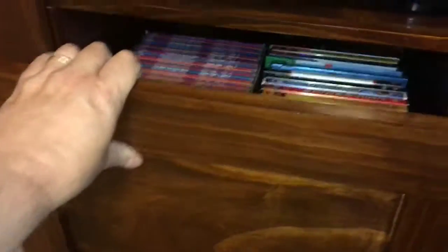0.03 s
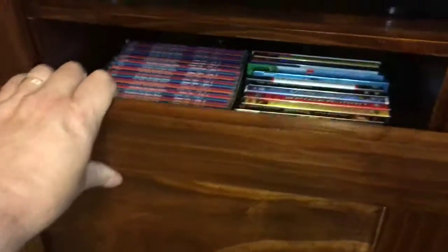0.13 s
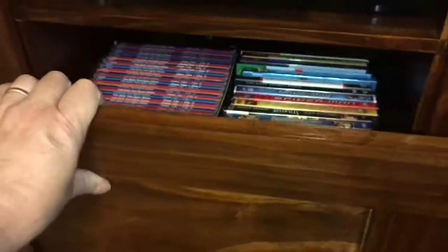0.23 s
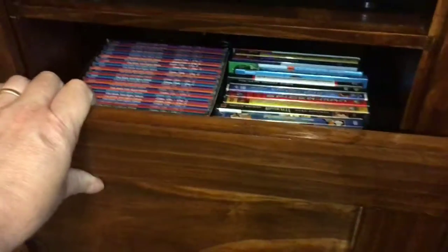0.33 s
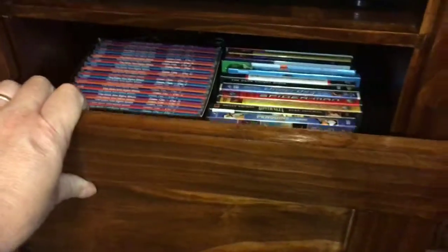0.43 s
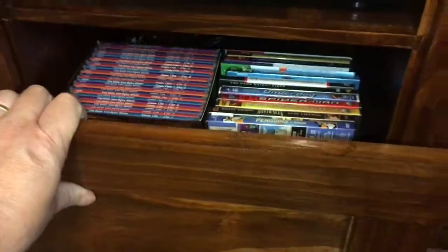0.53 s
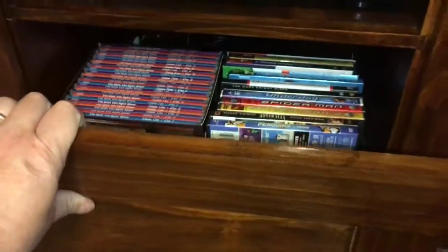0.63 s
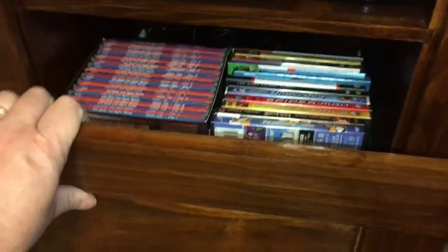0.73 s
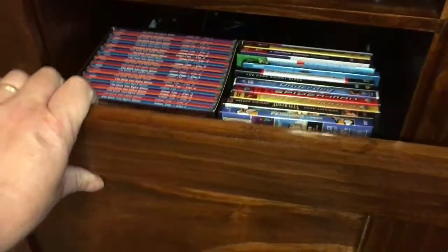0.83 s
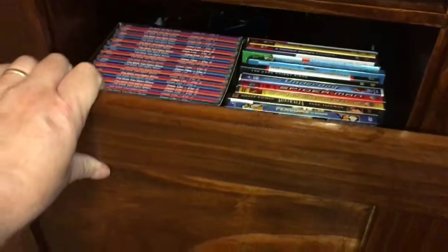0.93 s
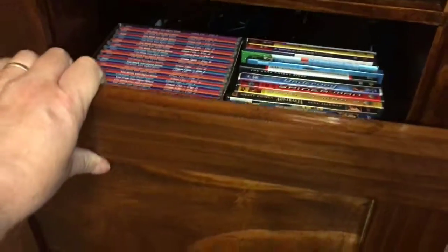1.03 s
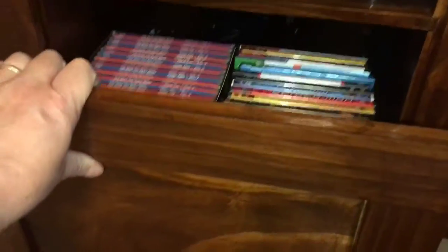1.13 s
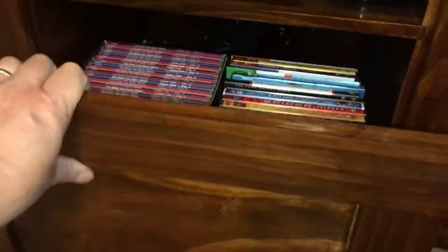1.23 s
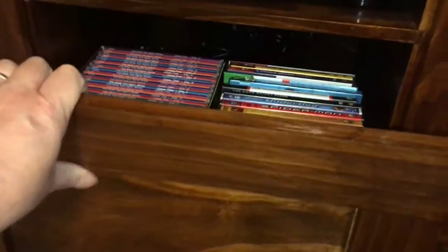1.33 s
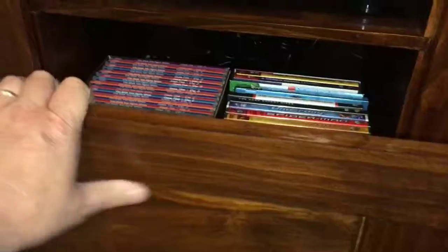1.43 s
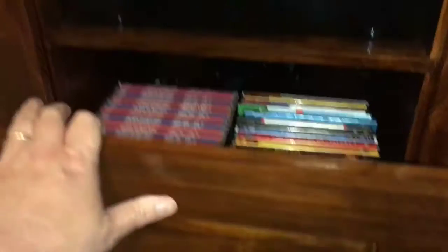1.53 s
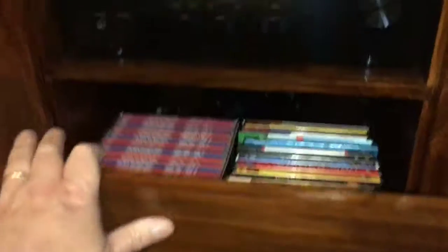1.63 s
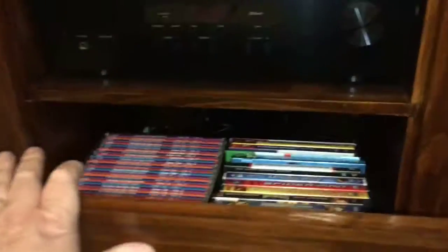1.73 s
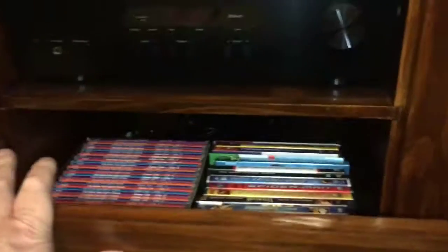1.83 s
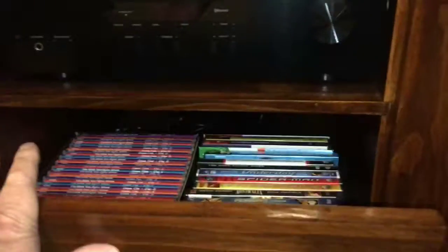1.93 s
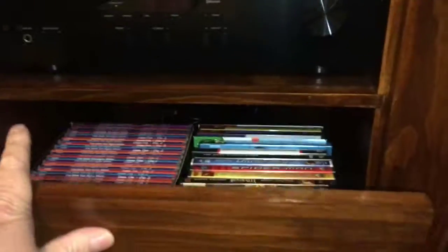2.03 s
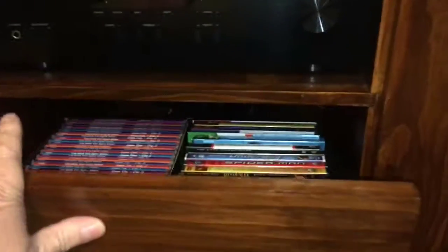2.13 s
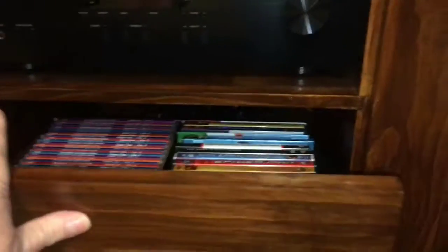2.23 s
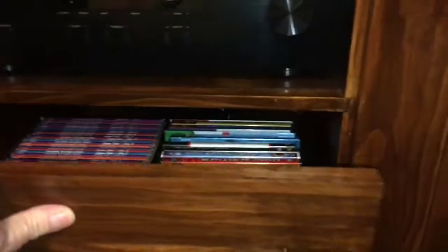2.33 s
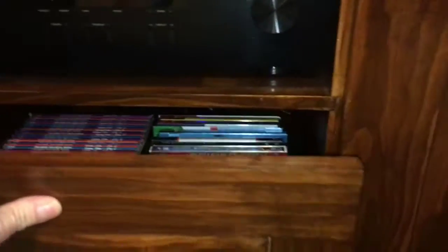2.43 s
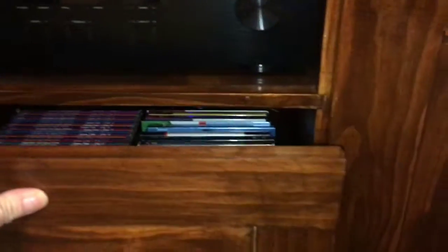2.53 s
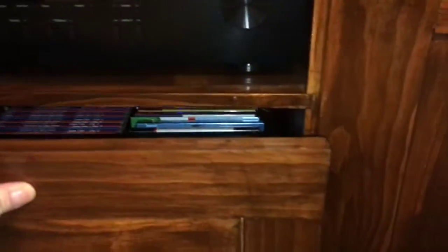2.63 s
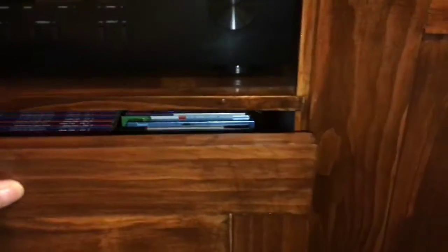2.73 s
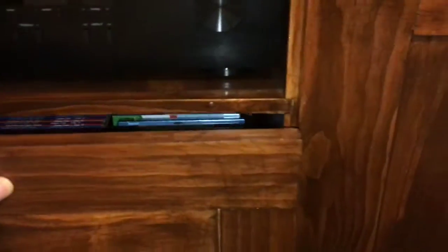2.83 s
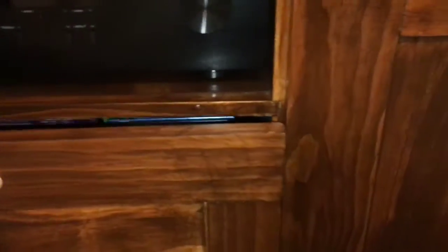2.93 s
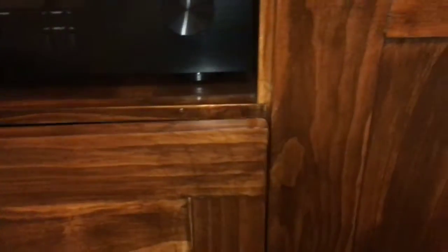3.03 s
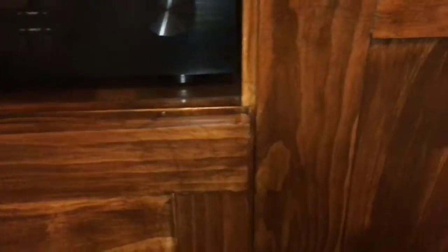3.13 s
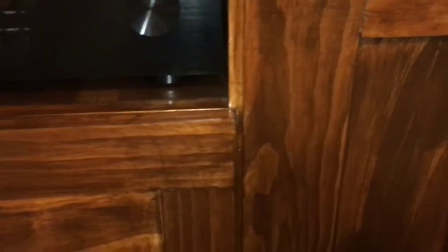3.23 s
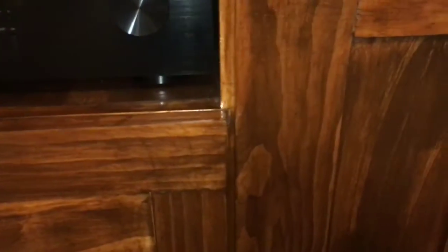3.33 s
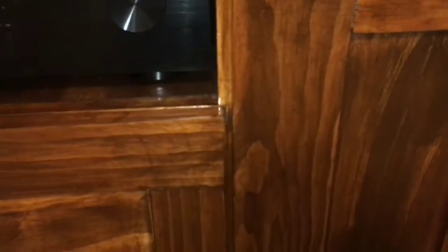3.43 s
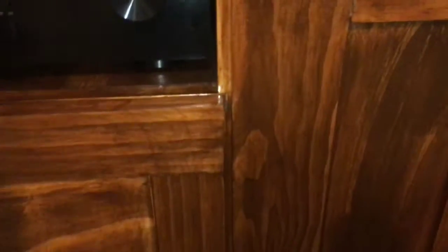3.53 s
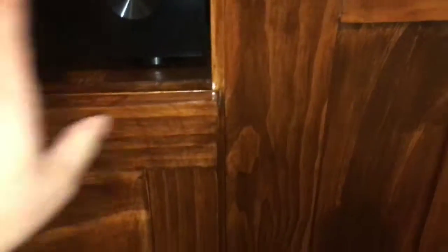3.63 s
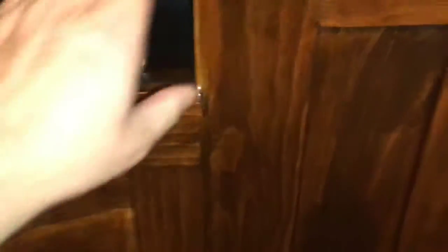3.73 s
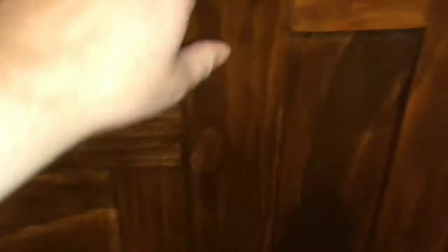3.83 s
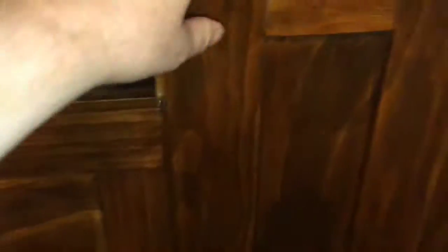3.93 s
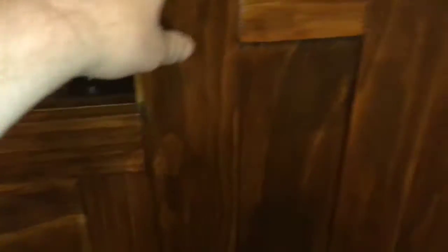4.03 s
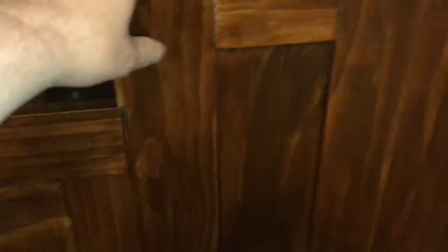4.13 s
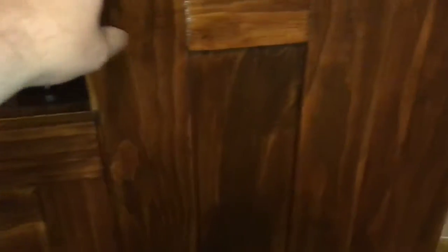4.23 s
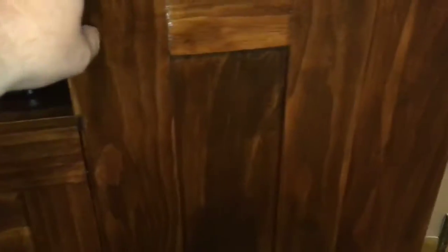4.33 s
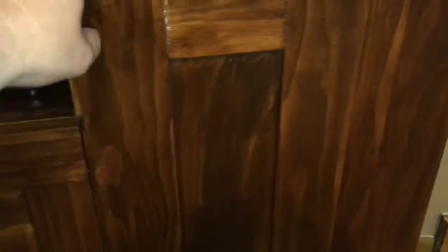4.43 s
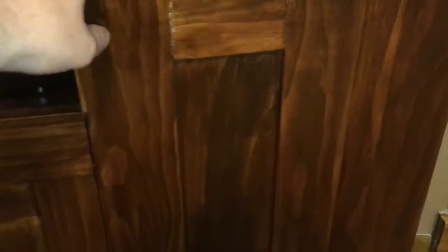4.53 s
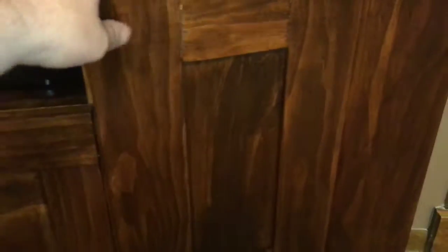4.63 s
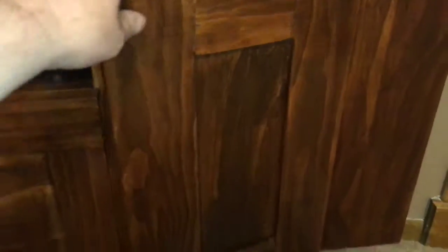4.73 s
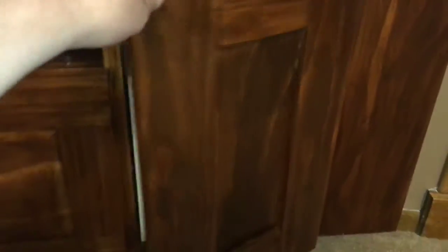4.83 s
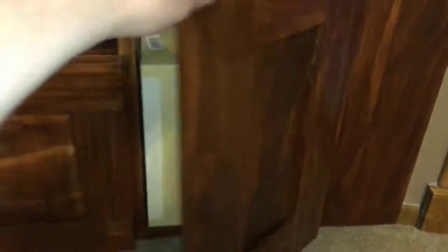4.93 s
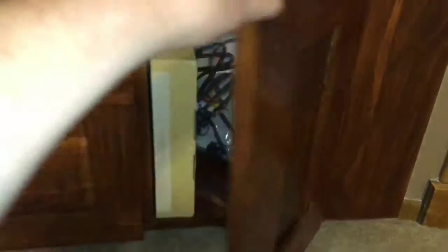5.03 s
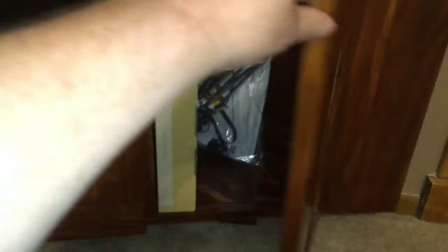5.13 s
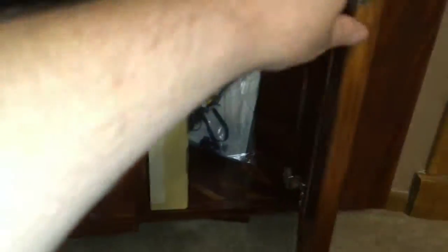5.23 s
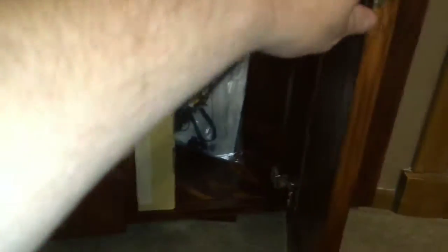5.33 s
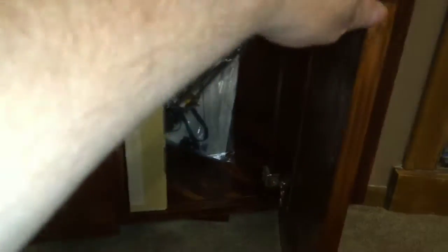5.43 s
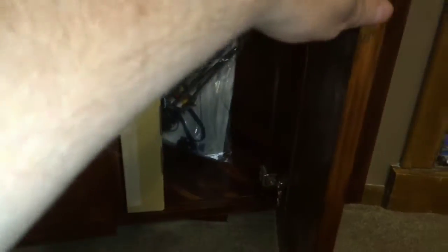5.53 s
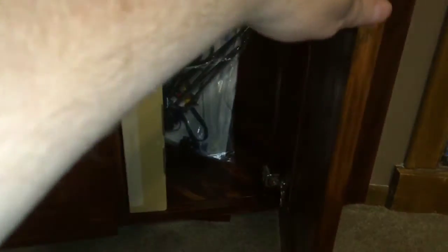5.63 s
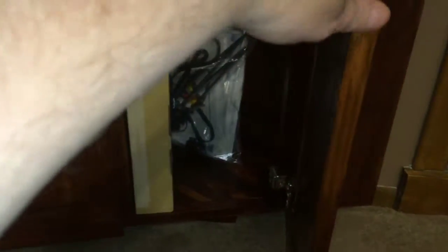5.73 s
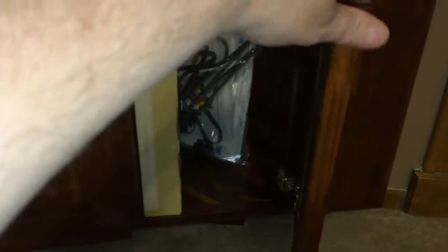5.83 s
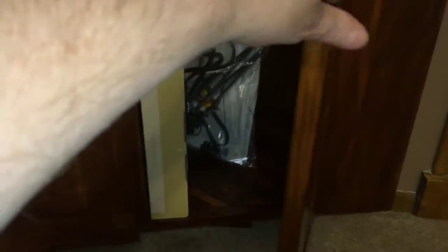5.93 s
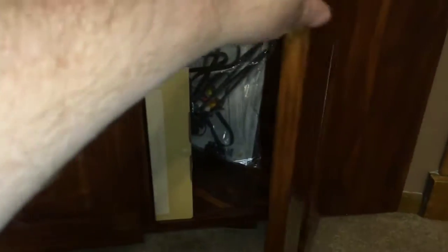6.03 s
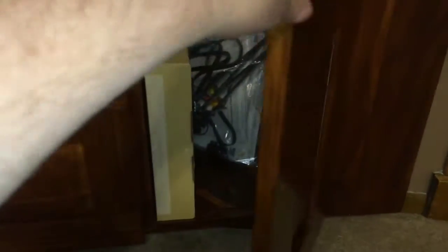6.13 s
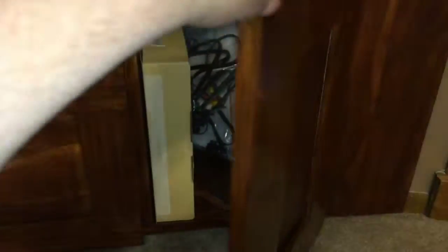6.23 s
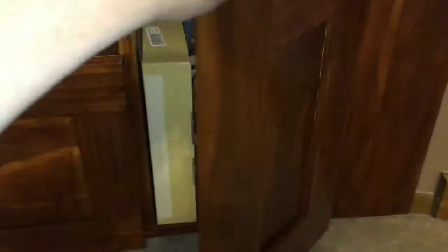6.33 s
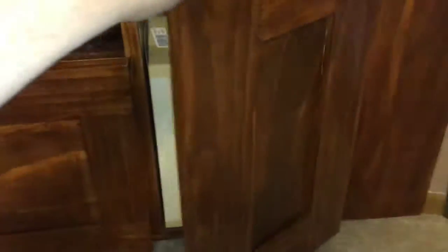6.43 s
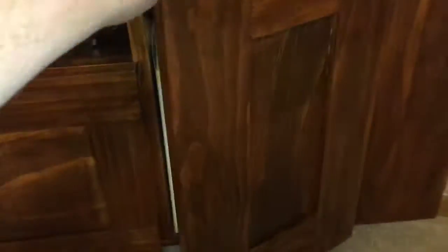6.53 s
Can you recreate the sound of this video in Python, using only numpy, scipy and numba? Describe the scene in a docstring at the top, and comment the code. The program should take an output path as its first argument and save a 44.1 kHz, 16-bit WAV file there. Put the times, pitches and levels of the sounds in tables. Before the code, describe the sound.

A steady low hum and soft air noise fill a small room, heard close through a phone microphone. From 0 to about 1.1 seconds a loaded wooden drawer rolls out on metal runners, grainy and rumbling, with soft deep thuds and small clicks near 0.7, then fades. Between 1.4 and 1.7 a hand brushes the wood, bright and papery with a dull board tone. The drawer rolls back from 1.8, bumping around 2.0 and 2.7, and slams at 3.34 with a loud, sharp, bassy clunk and a smaller knock at 3.44, trailed by brushing. Light taps come at 3.75 to 4.13 with faint sleeve rustle. At 4.4 to 4.7 the door catch clicks and scrapes, strongest at 4.7. Quiet hinge creaks and tiny squeaks follow around 5.0 to 5.2, a light knock at 5.4, another creak with a soft thud at 6.1, and a final faint tick at 6.35.

```python
"""A wooden drawer rolls out on metal runners, a hand brushes the wood, the drawer rolls back and
clunks shut, the hand brushes again, then a cabinet door opens: its catch clacks, its hinge creaks.
A quiet room hums behind it. Rolling, brushing and creaking are random noise or tiny slips sent
through resonances; knocks and thuds are decaying sines, the knocks with added noise."""
import sys
import numpy as np
from scipy import signal
from scipy.fft import rfft, irfft
from scipy.io import wavfile
from scipy.ndimage import uniform_filter1d
from numba import njit

SR = 44100
rng = np.random.default_rng(int(sys.argv[2]) if len(sys.argv) > 2 else 0)


def master(y):
    """Save y as 16-bit WAV."""
    cut = np.clip(np.atleast_2d(y).T, -1, 1)
    pcm = np.round(cut * 32767)  # scale
    wavfile.write(sys.argv[1], SR, pcm.astype(np.int16))


N = 289737
T = np.arange(N) / SR  # time of every sample, seconds

# colour of skin rubbing, also used for the treble tick of knocks: pitch_hz, level_db (per Hz)
SKIN = [(1760, -10), (3000, -1.5), (3380, 0.5), (5350, -4.5), (5900, 6), (6500, 1.5), (7600, -1),
        (10900, -0.5), (12500, 2), (14800, 0.5), (15800, -4.5)]


def undb(db):
    """Turn decibels into a gain."""
    return np.exp(np.asarray(db) * np.log(10) / 20)


def unit(x):
    """Scale a sound to an average (rms) level of 1."""
    return x / np.sqrt(np.mean(x ** 2))


def coloured(x, table):
    """Shape x by a spectrum of (Hz, dB) points, then scale it to rms 1."""
    hz, db = np.transpose(table)
    f = np.arange(len(x) // 2 + 1) * SR / len(x) + 1  # the 1 avoids log(0)
    gain = undb(np.interp(np.log(f), np.log(hz), db, -120, -120))
    return unit(irfft(rfft(x) * gain, len(x)))


def band(x, hz, width):
    """One resonance, gain 1 at its centre; width in Hz."""
    hz = min(hz, .4 * SR)
    return signal.lfilter(*signal.iirpeak(hz, hz / width, SR), x)


@njit
def glide(x, hz, width):
    """State-variable band-pass whose centre may move every sample."""
    y, b, l = np.empty(len(x)), 0., 0.  # b and l are the band and low states
    for i in range(len(x)):
        g, k = np.tan(np.pi * hz[i] / SR), width / hz[i]
        v = (b + g * (x[i] - l)) / (1 + g * (g + k))
        b, l, y[i] = 2 * v - b, l + 2 * g * v, k * v
    return y


def resonant(x, peaks):
    """Sum of (Hz, width, dB) resonances with alternating sign, scaled to rms 1."""
    total = 0
    for k, (hz, width, db) in enumerate(peaks):
        total = total + (-1) ** k * undb(db) * band(x, hz, width)
    return unit(total)


def ring(modes, gains, t, damp):
    """Decaying sines of (Hz, dB, t60) modes; damp multiplies the ring time."""
    hz, db, t60 = np.transpose(modes)[:, :, None]
    decay = undb(db - 60 * t / (t60 * damp))
    return np.sum(gains[:, None] * decay * np.sin(2 * np.pi * hz * t), axis=0)


def walk(rate):
    """Random levels drawn rate times a second, joined by ramps; spread near 1."""
    levels = rng.standard_normal(int(N / SR * 60))
    return np.sqrt(3 / 2) * np.interp(T * rate, np.arange(len(levels)), levels)


def grit(rate, scatter_db):
    """Random slips at a mean rate per second, with a long tail of sizes."""
    hit = rng.random(N) < rate / SR
    size = rng.standard_normal(N) * undb(scatter_db * rng.exponential(size=N))
    return hit * size / np.sqrt(rate / SR)


def curves(tables):
    """Columns of several curve tables as sample arrays, and a soft-edged gate open inside them."""
    s, *columns = np.transpose(np.concatenate(tables))
    gate = sum((T >= t[0][0]) & (T <= t[-1][0]) for t in tables)
    return uniform_filter1d(1. * gate, size=600), [np.interp(T, s, c) for c in columns]


def strokes(table):
    """One gain curve for each level column: every row swells to its peak and fades, straight in dB."""
    slope_db = 20  # a stroke is this far under its peak one rise before and one fall after
    out = 0
    for s, rise_s, fall_s, *db in table:
        away = np.maximum((s - T) / max(rise_s, .002), (T - s) / max(fall_s, .002))
        out = out + undb(np.array(db)[:, None] - slope_db * away)
    return out


def near_db(hz, centre_hz, octaves):
    """Loss of a mode that lies away from the favoured pitch."""
    return -6 * (np.log2(hz / centre_hz) / octaves) ** 2


def add(out, s, x):
    """Mix x into out at time s."""
    i = int(s * SR)
    out[i:i + len(x)] += x[:N - i]


def drawer():
    """Ball bearings grind along the runners; the load shakes the deep modes of the cabinet."""
    # drawer out, then drawer in: time_s, rolling_level_db, rumble_level_db
    slide = [
        [(0.0, -52.5, -44), (0.296, -49.5, -42.5), (0.4, -52.5, -40), (0.63, -50, -38), (0.72, -49, -58),
         (0.768, -46.5, -48), (0.832, -48.5, -42), (0.938, -54.5, -46.5), (1.068, -83, -51), (1.15, -96, -85)],
        [(1.74, -76, -48), (1.83, -57.5, -53.5), (2.0, -50.5, -42.5), (2.38, -47.5, -43.5), (2.55, -50.5, -38),
         (2.6, -51, -50), (2.722, -52, -34), (2.85, -54, -44), (3.078, -48, -36.5), (3.19, -54, -37),
         (3.228, -53, -27), (3.282, -55, -35.5), (3.315, -52, -35)],
    ]
    # resonances of the metal runners: pitch_hz, width_hz, level_db (relative)
    runner = [(902, 34, 1), (1341, 54.5, 1.5), (1647, 77, 0.5), (1934, 42, -1), (2160, 28, 0.5),
              (2610, 130, -12.5), (3064, 31, -8), (4570, 130, -16), (5380, 550, -18.5)]
    # colour of the rolling noise: pitch_hz, level_db (per Hz)
    roll_colour = [(71, -13), (120, 3.5), (250, -12.5), (375, -9), (418, -10.5), (658, -12), (1190, -19),
                   (1330, -23.5), (2220, -21), (5000, -44), (6500, -74), (11000, -120)]
    # colour of the hiss: pitch_hz, level_db (per Hz)
    hiss_colour = [(2060, -18), (3500, 3), (4230, -11), (4590, -18.5), (4950, -19.5), (7010, -4.5),
                   (9550, -6), (10400, -14), (11100, -2), (12500, -4), (15100, -4.5), (15800, -14)]
    # centres of the patches of hiss that flare: pitch_hz
    flares = [4660, 5000, 6430, 8800, 9960, 12870, 13730]
    # cabinet resonances while loaded by the rolling drawer: pitch_hz, width_hz, level_db (relative)
    carcass = [(82.2, 8.8, 0.5), (62.2, 29, -9.5), (45, 20.4, -8.5), (134, 38, -15.5), (161, 53, -12)]
    # hiss at the reference roll level, and how fast it grows with the roll
    hiss_ref_db, hiss_db_per_db, roll_ref_db = -64, 1.53, -51

    gate, (roll_db, rumble_db) = curves(slide)
    balls = grit(16000., scatter_db=0.2)

    # the metal resonances swell and drift at random
    metal = 0
    for hz, width, db in runner:
        swell = undb(db + 2.95 * walk(24))
        metal = metal + swell * glide(balls, hz * (1 + 0.011 * walk(3.2)), 1. * width)
    roll = unit(coloured(balls, roll_colour) + undb(-7) * unit(metal))
    roll = roll * undb(roll_db + 1.4 * walk(24.86))

    # patches of the hiss flare on their own
    hiss = coloured(balls, hiss_colour)
    patches = 0
    for hz in flares:
        flare = undb(-6.5 + 6.3 * walk(7.56))
        patches = patches + flare * glide(hiss, hz * (1 + 0.024 * walk(4.95)), 0.074 * hz)
    hiss_db = hiss_ref_db + hiss_db_per_db * (roll_db - roll_ref_db)
    hiss = unit(hiss + patches) * undb(hiss_db + 0.2 * walk(25))

    load = band(rng.standard_normal(N), 77, 82)
    rumble = resonant(load, carcass) * undb(rumble_db)
    return gate * (roll + hiss + rumble)


def hand():
    """Skin drags over the wood: bright hiss plus a patchy dull ring of the board; a sleeve rustles."""
    # brushing hand, the dull tail of the slam at 3.355 s, and a low wood scrape at 4.33 s:
    # peak_s, rise_s, fall_s, bright_level_db, dull_level_db
    brush = [(1.388, 0.011, 0.028, -74, -77), (1.436, 0.011, 0.14, -60.5, -72),
             (1.5, 0.046, 0.19, -89, -59.5), (1.592, 0.19, 0.084, -58.5, -57),
             (1.71, 0.065, 0.017, -65, -55.5), (3.355, 0.011, 0.11, -56.5, -49.5),
             (3.445, 0.0039, 0.11, -78, -61), (3.519, 0.098, 0.0063, -61.5, -74),
             (4.33, .03, 0.26, -94, -65)]
    # sleeve moving near the door: peak_s, rise_s, fall_s, level_db
    rustle = [(4.02, 0.28, 1.9, -70), (4.85, 0.47, 0.28, -78), (5.3, 0.4, 1.2, -79)]
    # resonances of the board: pitch_hz, width_hz, level_db (relative)
    wood = [(558, 37, 1.5), (860, 19, -0.5), (1284, 60, -8), (1793, 110, -10.5), (2180, 75, -12.5),
            (2420, 57, -18)]

    bright, dull = strokes(brush)
    drag = grit(15000., scatter_db=2.03)
    board = unit(sum(undb(db + 4.1 * walk(24.25)) * band(drag, hz, width) for hz, width, db in wood))
    board = unit(board + undb(-16.5) * unit(band(drag, 1000, 1900)))
    skin = coloured(drag, SKIN)
    brushing = skin * bright * undb(2.2 * walk(45)) + board * dull
    sleeve = skin * strokes(rustle)[0] * undb(0.82 * walk(8.9))
    return brushing + sleeve


def hinge():
    """Dense slips scrape through the modes of catch and hinge; now and then one mode squeaks."""
    # dry scrapes of door catch and hinge pin: peak_s, rise_s, fall_s, lower_modes_db, upper_modes_db
    creak = [(4.51, 0.055, 0.032, -56.5, -74), (4.64, .03, 0.034, -64, -74),
             (4.675, 0.036, 0.046, -48, -78), (4.708, 0.0065, 0.02, -41.5, -57),
             (4.835, 0.027, 0.11, -63, -74), (5.035, 0.082, 0.068, -66.5, -80),
             (5.11, 0.11, 0.12, -68.5, -72), (5.152, 0.011, 0.024, -60, -72),
             (5.202, 0.067, 0.058, -58.5, -69.5), (5.97, 0.049, 0.059, -71, -82),
             (6.105, 0.045, 0.036, -57.5, -68)]
    # catch and hinge resonances, last four are the upper modes: pitch_hz, width_hz, level_db (relative)
    hinge_modes = [(770, 100, -2), (1145, 48, 1), (1480, 110, -3), (1710, 230, -10.5), (2310, 45, -0.5),
                   (2620, 110, -3.5), (3240, 200, 0), (3930, 140, -1.5), (4460, 130, 8.5),
                   (5230, 240, 11.5), (6200, 250, 7), (6440, 300, -19)]
    # colour of the scrape under the lower modes: pitch_hz, level_db (per Hz)
    scrape = [(290, -11), (500, 3.5), (1120, -4.5), (1840, -4), (2250, -3), (2920, -5), (3180, -14),
              (4980, -41), (15800, -13)]
    # short metal squeaks: start_s, length_s, level_db, favoured_pitch_hz
    squeaks = [(4.615, 0.026, -64, 2480), (5.022, 0.032, -64, 2390), (5.079, 0.039, -66, 2460),
               (5.12, 0.028, -65, 2460), (5.626, 0.1, -78, 3260), (5.943, 0.054, -72, 3850),
               (6.063, 0.075, -64.5, 2490), (6.068, 0.061, -65, 3883)]
    overtone_db = -10.5

    slips = grit(12000., scatter_db=1.0)
    modes = [undb(db + 2.5 * walk(30)) * unit(band(slips, hz, width)) for hz, width, db in hinge_modes]
    lower = unit(unit(sum(modes[:8])) + undb(-3) * coloured(slips, scrape))
    upper = unit(sum(modes[8:]))
    out = np.sum(strokes(creak) * [lower, upper], axis=0)

    for s, length_s, db, hz in squeaks:
        noise = rng.standard_normal((2, SR // 5))
        overtone = unit(band(noise[1], 2.23 * hz, 450)) * undb(overtone_db)
        tone = unit(band(noise[0], hz, 47)) + overtone
        swell = signal.windows.tukey(int(length_s * SR), .6)
        # take the end of the tone, where the resonance has built up
        add(out, s, tone[-len(swell):] * swell * undb(db))
    return out


def knocks():
    """Each contact: a ringing click, a treble tick and a dry ring of the boards near the spot struck."""
    # hard contacts: start_s, click_level_db, click_pitch_hz, click_and_tick_t60_s,
    # treble_level_db, panel_level_db, panel_centre_hz (t60 is the time to fall by 60 dB)
    contacts = [(0.6835, -47, 3300, 0.03, -66, -70, 700), (0.7713, -45, 2320, 0.04, -46, -50.5, 864),
                (1.7047, -53.5, 1343, 0.02, -48, -69, 557), (3.1975, -47.5, 2450, 0.032, -65, -44, 526),
                (3.2955, -46, 1690, 0.033, -74, -34, 590), (3.3364, -22, 1636, 0.045, -46, -23.5, 478),
                (3.3399, -27, 1700, 0.013, -59, -26.5, 664), (3.3506, -41.5, 1880, 0.046, -54, -35, 347),
                (3.4407, -38, 1650, 0.032, -51, -35, 770), (3.7514, -62.5, 3580, 0.037, -64.5, -73, 530),
                (3.9764, -65, 6680, 0.024, -57, -67.5, 523), (4.1222, -57, 2100, 0.024, -50, -58, 464),
                (4.1274, -44.5, 1840, 0.033, -42, -55, 670), (4.132, -47, 1850, 0.086, -55, -46, 776),
                (4.4235, -49.5, 3800, 0.038, -50, -53, 486), (4.429, -50, 2270, 0.05, -55, -54, 647),
                (4.5115, -48.5, 2420, 0.033, -56, -45.5, 725), (4.6565, -55, 2190, 0.026, -62, -55, 680),
                (4.678, -54, 3220, .025, -62, -53, 720), (4.7037, -47, 2260, 0.035, -49, -49.5, 734),
                (5.1505, -44.5, 1540, 0.019, -59, -84, 1200), (5.4355, -55.5, 2960, 0.017, -57, -73.5, 517),
                (6.1047, -61, 2410, 0.038, -58, -57.5, 620), (6.3486, -69, 3100, 0.014, -53, -82.5, 538)]
    # board modes: pitch_hz, level_db (relative), t60_s (before scaling for drawer or door)
    panels = [(331, 13, 0.23), (390, 6.5, 0.073), (469, 0.5, 0.08), (558, -1.5, 0.087), (637, -7.5, 0.1),
              (679, 10, 0.027), (758, -8.5, 0.14), (845, -4, 0.11), (960, -28, 0.052), (1121, 20.5, 0.039),
              (1210, -13, 0.069), (1390, 10.5, .08)]
    # the loaded drawer boards ring shorter than the free door
    drawer_t60_s, door_t60_s, door_from_s = 0.054, 0.081, 3.6
    rise_s, rattle_db = 0.0011, 3.5

    out, t = np.zeros(N), np.arange(SR // 5) / SR
    rise = 1 - np.exp(-t / rise_s)
    for s, click_db, click_hz, t60, treble_db, panel_db, panel_hz in contacts:
        noise = rng.standard_normal((3, len(t)))
        panel_t60 = door_t60_s if s > door_from_s else drawer_t60_s

        rattle = noise[0]
        for _ in range(3):
            rattle = band(rattle, click_hz, 0.75 * click_hz)
        click = np.sin(2 * np.pi * click_hz * t) + undb(rattle_db) * unit(rattle)
        tick = coloured(noise[1], SKIN)
        click_decay = undb(-60 * t / max(t60, .004))
        hard = click_decay * (click * undb(click_db) + tick * undb(treble_db))

        # modes near the struck spot's pitch are favoured, with random scatter
        spot_db = near_db(np.array(panels)[:, 0], panel_hz, octaves=0.3)
        spot = undb(spot_db + 3.4 * rng.standard_normal(len(panels)))
        modes = ring(panels, spot, t, panel_t60 / 0.074)
        # the many weak modes between the strong ones blur into noise
        blur = band(band(noise[2], panel_hz, 0.85 * panel_hz), panel_hz, 0.88 * panel_hz)
        blur = unit(blur) * undb(1 - 60 * t / panel_t60)
        add(out, s, rise * (hard + (modes + blur) * undb(panel_db)))
    return out


def thuds():
    """A smooth push of a few milliseconds into the low modes of the cabinet body."""
    # soft blows on the body: start_s, deep_level_db, front_level_db, push_length_s (at least 1 ms)
    blows = [(0.09, -33, -49, 0.0066), (0.345, -22.5, -45, 0.0042), (0.782, -28.5, -43, 0.0074),
             (2.023, -23, -46, 0.0082), (2.15, -28, -53, 0.011), (2.691, -27.5, -56, 0.002),
             (3.112, -39, -25.5, 0.0053), (3.122, -35, -16.5, 0.0087), (3.196, -20, -35, 0.0043),
             (3.342, -20, -14, 0.0024), (3.349, -10.5, -30, 0.0023), (3.361, -29.5, -10, 0.0057),
             (3.443, -46, -27.5, 0.0012), (4.141, -43, -30.5, 0.003), (4.517, -40, -37, 0.0029),
             (4.541, -42, -49, 0.0037), (4.563, -62, -41, 0.0039), (4.703, -35, -44.5, 0.00082),
             (4.745, -46, -48, 0.0016), (5.248, -33, -50.5, 0.0017), (6.116, -36, -50.5, 0.0064)]
    # body modes, first two are the deep ones: pitch_hz, level_db (relative), t60_s (ringing freely)
    body = [(85.2, -4, 0.77), (59.3, -9, 0.088), (166.6, 5, 0.17), (140, -18.5, 0.072), (201, -12, 0.29),
            (247.7, -8.5, 0.32), (327, -5.5, 0.19)]
    damp = 0.58  # share of the free ring time left by the hand and the load

    out, t = np.zeros(N), np.arange(SR // 3) / SR
    for s, deep_db, front_db, push_s in blows:
        push = np.hanning(int(np.clip(push_s, .001, .02) * SR) + 2)
        gains = undb([deep_db] * 2 + [front_db] * (len(body) - 2))
        add(out, s, signal.fftconvolve(ring(body, gains, t, damp), push / push.sum()))
    return out


def room_tone():
    """Soft air noise that flickers a little, with wavering mains and fan lines."""
    # colour of the air noise: pitch_hz, level_db (per Hz)
    air_colour = [(13, -47), (22, -49), (43, -1.5), (95, -4), (128, -5), (169, -9.5), (309, -15),
                  (336, -17.5), (430, -25), (1010, -35.5), (1330, -34.5), (2180, -41.5), (3120, -41),
                  (4840, -47.5), (15800, -43)]
    # hum lines: pitch_hz, level_db (rms)
    hum_lines = [(59, -56.5), (120, -59), (130, -55.5), (358, -75.5)]
    air_db = -52.5

    flicker_db = .7 * walk(2.5)
    air = coloured(rng.standard_normal(N), air_colour) * undb(air_db + flicker_db)
    hum = 0
    for hz, db in hum_lines:
        level = np.sqrt(2) * undb(db + 0.29 * walk(3.94))  # root 2 turns rms into peak
        turns = np.cumsum(hz * (1 + 0.00979 * walk(3))) / SR
        hum = hum + level * np.sin(2 * np.pi * turns)
    return air + hum


def scene():
    """All sources, with a short dull echo tail from the walls on all but thuds and room tone."""
    room_t60_s, room_db, room_hz = .3, -21, 2500
    near = drawer() + hand() + hinge() + knocks()
    t = np.arange(SR // 2) / SR
    tail = rng.standard_normal(len(t)) * undb(-60 * t / room_t60_s) * (t > .004)
    tail = signal.lfilter(*signal.butter(1, room_hz, fs=SR), tail)
    wet = signal.fftconvolve(near, tail / np.sqrt(np.sum(tail ** 2)))[:N]
    return (near + undb(room_db) * wet + thuds() + room_tone())[None]


def record(dry):
    """The phone microphone drops the deepest bass and cuts the top."""
    low_hz, top_hz = 40, 15850
    dry = signal.sosfilt(signal.butter(5, low_hz, "high", fs=SR, output="sos"), dry)
    return signal.sosfilt(signal.ellip(10, .2, 70, top_hz, fs=SR, output="sos"), dry)


dry = scene()
out = record(dry)
master(out)
```